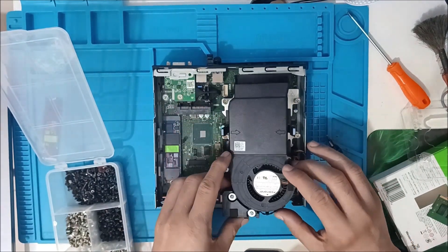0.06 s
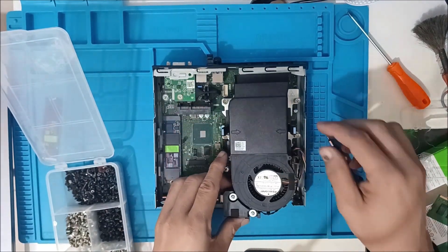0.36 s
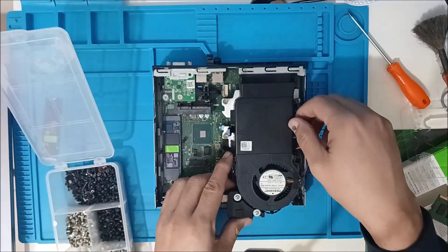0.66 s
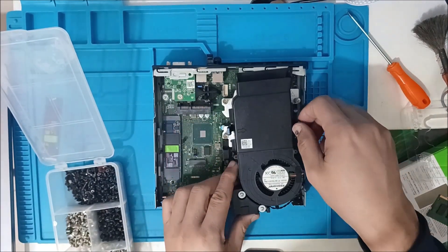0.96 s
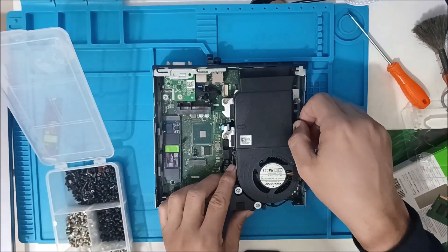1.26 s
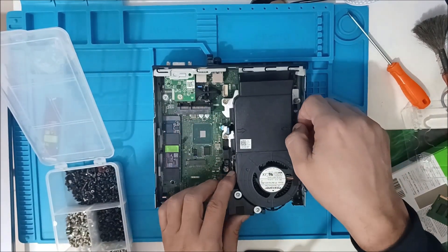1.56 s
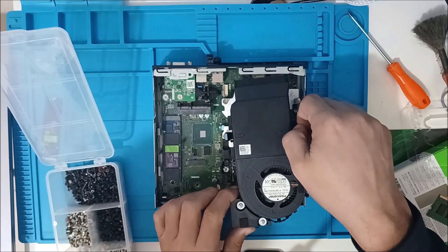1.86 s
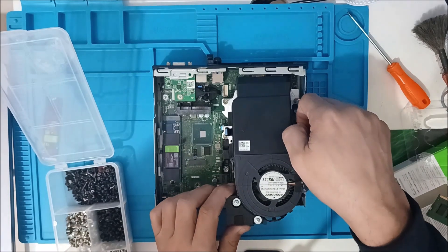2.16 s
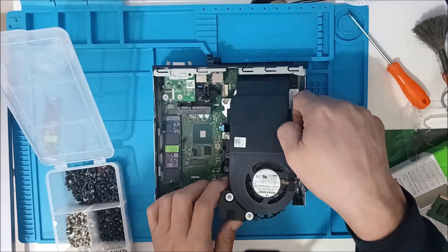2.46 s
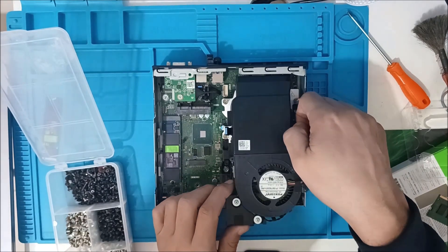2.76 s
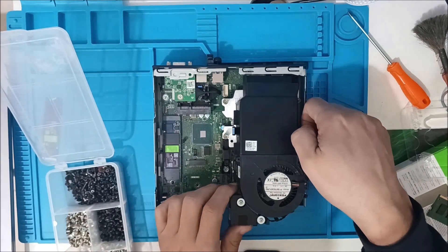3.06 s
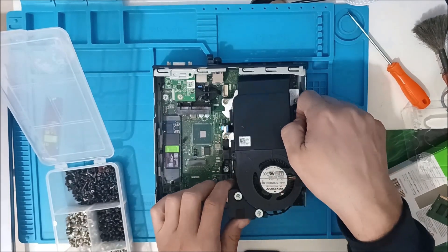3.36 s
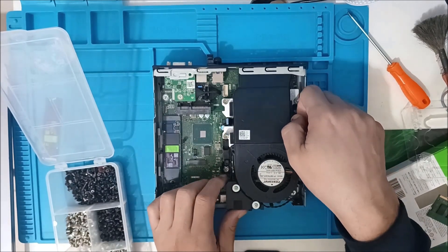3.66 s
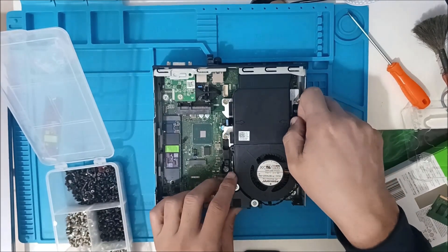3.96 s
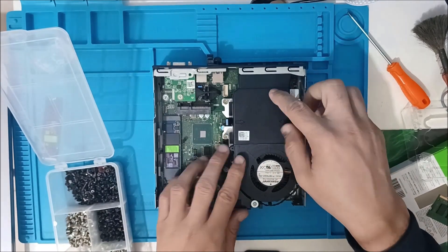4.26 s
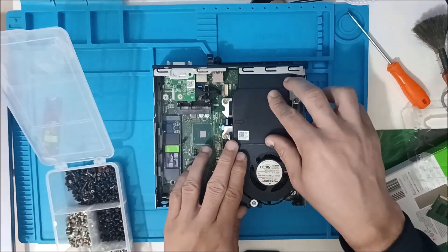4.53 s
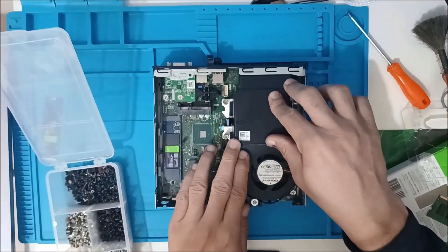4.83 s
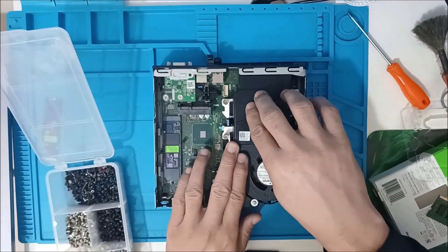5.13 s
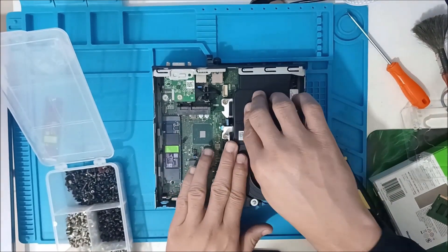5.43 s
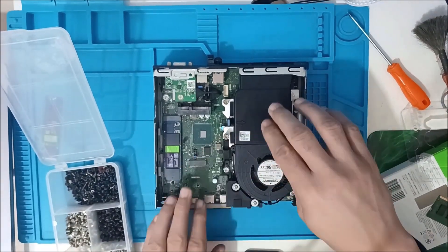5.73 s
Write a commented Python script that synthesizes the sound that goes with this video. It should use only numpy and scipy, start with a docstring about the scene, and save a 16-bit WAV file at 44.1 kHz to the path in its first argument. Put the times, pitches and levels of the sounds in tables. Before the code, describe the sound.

A plastic blower fan is worked into a small steel computer chassis on a rubber mat, heard close in a small room with a steady low rumble. It opens with a short scrape, a squeak and a few ticks. At about 0.6 seconds comes a sharp clack with a dull bump. From 1 to 3 seconds there are quieter, uneven scrapes and light clicks of plastic on metal, with soft hollow knocks from the case. Between 3 and 3.9 seconds the handling gets busier, with grinding, clacks and brief high squeaks. A tiny squeak and a quick cluster of clacks come around 4.5 seconds. At 4.7 seconds the part snaps home, the loudest sound, a rapid double crack with a short low boom from the chassis. From 5 seconds on, only faint ticks and light rubbing remain over the rumble.

```python
"""Fitting a blower into a computer

A plastic blower is worked into the sheet-steel chassis of a small computer, on a rubber bench mat.
It scrapes, ticks and squeaks against the metal, then snaps home. Each touch sets the plastic shell
and steel panels ringing, and harder knocks make the chassis boom. A small room rumbles around it."""
import sys
import numpy as np
from scipy import signal
from scipy.io import wavfile
from scipy.ndimage import uniform_filter1d

SR = 44100
rng = np.random.default_rng(int(sys.argv[2]) if len(sys.argv) > 2 else 0)


def transcribe(signal):
    """Save signal, clipped to [-1, 1], as a 16-bit WAV file at the path in sys.argv[1]."""
    frames = np.atleast_2d(signal).T
    limited = np.clip(frames, -1, 1)
    pcm = np.round(limited * 32767).astype(np.int16)
    wavfile.write(sys.argv[1], SR, pcm)


N = 255339
TIME = np.arange(N) / SR
CUTOFF_HZ = 15100
BAND_EDGES = 20 * 2 ** (np.arange(21) / 2)   # Hz, half an octave apart
BAND_CENTRES = np.sqrt(BAND_EDGES[1:] * BAND_EDGES[:-1])

# The room's background noise: (frequency [Hz], level [dB per Hz])
RUMBLE_SPECTRUM = [(22, -27), (50, -12), (82, -1), (105, -6.5), (170, -6.5), (230, -17.5), (290, -14.5),
                   (700, -43.5), (2000, -38.5), (6000, -44.5), (15000, -45.5)]
# The rise and fall of a low drone: (time [s], level [dB])
DRONE_LEVELS = [(0, -67), (1.2, -47.5), (2.8, -50), (4.3, -47), (5.6, -54.5)]
# How long echoes last; t60 is the time to fade by 60 dB: (frequency [Hz], t60 [s])
ROOM_DECAY = [(600, 0.29), (2500, 0.26), (6000, 0.3), (14000, .22)]
# How alike left and right are, for room and direct sound: (frequency [Hz], likeness [-1 to 1])
ROOM_STEREO = [(100, 0.79), (300, 0.76), (640, 0.36), (1400, -0.085), (4000, 0.48)]
DIRECT_STEREO = [(200, 1), (1000, 0.16), (2500, 0.084), (6000, 0.053), (12000, 0.092)]
# A bump muffled by hands and mat: (frequency [Hz], level [dB per Hz])
BUMP_SPECTRUM = [(45, -24.5), (75, -7), (120, 2.5), (200, -6.5), (300, 0.5), (400, -7.5), (500, -4.5),
                 (800, -29), (3000, -74.5)]
# The chassis's low modes, the notes it rings at: (pitch [Hz], level [dB], t60 [s])
CHASSIS_MODES = [(65, -2, 0.25), (108.4, -5.5, 0.22), (165, 0, 0.16), (199, -8.5, 0.14), (255, -4.5, 0.15),
                 (292.9, 0, 0.18), (330, -4.5, 0.16), (506.2, -4.5, 0.15)]
# Rings of the blower shell and side panels: (pitch [Hz], width [Hz], gain [dB])
SHELL_RINGS = [(506, 84, 8), (1052, 77, -3), (1655, 61, -7), (1990, 130, 3), (10830, 2000, 0.5)]
# The tone of plastic touching steel: (frequency [Hz], level [dB per Hz])
CONTACT_SPECTRUM = [(150, -19), (440, -4), (720, -9), (1100, 4), (1800, 3.5), (2700, 2), (4200, -4.5),
                    (6500, -2.5), (8500, -14), (12200, -11.5), (15500, -27.5)]
# Fingers shifting their grip between pushes: (time [s], level [dB])
GRIP_LEVELS = [(0.0, -45), (0.38, -62.5), (0.72, -59.5), (1.45, -60), (1.8, -49.5), (2.25, -71),
               (2.87, -70.5), (3.35, -48), (3.95, -57.5), (4.6, -61.5), (5.0, -66.5), (5.43, -78),
               (5.79, -66)]
# Pushes that slide the blower: (start [s], length [s], scrape [dB], brightness [dB], shove [dB])
PUSHES = [(0.004, 0.07, -32.5, -9.5, -38), (0.555, 0.056, -35, -6.5, -39), (0.702, 0.21, -53, 1, -51.5),
          (0.996, 0.058, -43.5, -4.5, -52), (1.044, 0.094, -43, 1, -39), (1.234, 0.11, -53, 1, -59),
          (1.631, 0.14, -46.5, -2.5, -55), (1.808, 0.16, -53, -1, -48), (2.082, 0.028, -36, -5.5, -28.5),
          (2.154, 0.057, -57, 2, -41.5), (2.304, 0.026, -42, 1.5, -41), (2.946, 0.073, -53, 7, -60),
          (3.002, 0.037, -42, 3, -34), (3.045, 0.083, -45.5, 6, -45.5), (3.155, 0.17, -40, -5, -36),
          (3.318, 0.071, -40, 7, -38), (3.388, 0.07, -33, -2.5, -29.5), (3.793, 0.073, -44.5, 2, -42.5),
          (4.063, 0.034, -45, 4, -47), (5.06, 0.026, -63.5, 15, -50.5), (5.107, 0.034, -57, 7.5, -54),
          (5.527, 0.018, -47.5, 1.5, -46), (5.589, 0.018, -47.5, 0, -48)]
# A rib catches and grinds: (start [s], end [s], pitch [Hz], width [Hz], level [dB])
RIB_CATCHES = [(0.028, 0.074, 2080, 250, -40.5), (0.036, 0.083, 846, 109, -39.5),
               (0.435, 0.566, 1350, 260, -54.5), (1.035, 1.154, 1110, 380, -48.5),
               (1.762, 1.822, 878, 100, -47.5), (2.303, 2.333, 6400, 1800, -45.5),
               (3.072, 3.138, 2780, 300, -46.5), (3.25, 3.276, 1340, 350, -38),
               (3.345, 3.4, 1667, 120.4, -32), (3.418, 3.469, 2110, 698, -35.5),
               (3.419, 3.531, 1000, 350, -36), (3.856, 3.888, 1250, 219, -41.5),
               (4.135, 4.225, 1960, 450, -69), (5.073, 5.11, 1910, 250, -57.5),
               (5.735, 5.788, 2480, 400, -68)]
# An edge sticks and slips: (start [s], end [s], pitch [Hz], level [dB], octave [dB], wobble [share])
EDGE_SQUEAKS = [(0.047, 0.114, 1289, -30, -24, 0.0098), (1.09, 1.142, 871, -46, -28, 0.025),
                (3.016, 3.073, 1092, -42, -12, 0.018), (3.302, 3.319, 2600, -24, -17, 0.059),
                (3.436, 3.493, 3560, -26.5, -13.5, 0.018), (3.476, 3.488, 3465, -25.5, 5, 0.03),
                (4.444, 4.457, 3995, -23, -34, 0.03)]
# Plastic hits metal: (time [s], clack [dB], brightness [dB], sharpness [dB], thud [dB], ring [Hz])
HITS = [(0.084, -47.5, 2, 13, -43, 2100), (0.114, -39.5, 8, -7, -47, 5000),
        (0.174, -39, -2.5, -10, -46, 2056), (0.247, -32.5, 1.5, -8.5, -33.5, 1495),
        (0.605, -37, 12, -14, -31, 2000), (0.613, -13.5, 5, 0, -29, 1383), (0.617, -19, 0, -7, -29.5, 1100),
        (0.9585, -48.5, 2, -22, -68, 1680), (1.386, -35, -2, -8, -43.5, 2024),
        (1.676, -35, -9, -1, -41.5, 1650), (1.776, -46.5, 4, 4, -44, 905),
        (1.8598, -42, 0, -8, -41.5, 5200), (1.891, -40, 5, 6.5, -65, 2605),
        (1.9466, -39, 0.5, 7.5, -37.5, 1720), (2.0799, -50.5, 0, -3, -32, 1090),
        (2.1045, -42.5, -14, -16, -38, 1050), (2.116, -36.5, -19, -26, -33.5, 1981),
        (2.332, -42, -18, 8.5, -30.5, 7750), (2.4839, -33.5, -4.5, -17, -35.5, 1076),
        (2.5702, -36, -3, -3, -32, 4830), (3.0446, -34, -12, -22, -29.5, 790),
        (3.1853, -23, -7.5, -24, -30.5, 1072), (3.311, -23.5, 4.5, 4, -43, 2042),
        (3.3857, -27, -0.5, -15, -29.5, 4070), (3.482, -36, 12.5, 16, -24.5, 6860),
        (3.4924, -24, -18, -33, -26.5, 2000), (3.7216, -45, -27, -30, -50, 1440),
        (3.8636, -34, -12, -24, -32.5, 1284), (3.932, -45, -4, -25, -44.5, 1330),
        (4.356, -41, -3, -0.5, -35, 2030), (4.446, -20, 4.5, -5, -32.5, 1744),
        (4.465, -23.5, -1.5, -15, -25.5, 1701), (4.4818, -24, 4.5, -15, -24, 3200),
        (4.6937, -9.5, 4.5, 9, -20, 1764), (4.7041, -7.5, 3.5, 0, -11.5, 1592),
        (4.712, -16.5, 7, -12, -23.5, 1690), (4.738, -23, 2.5, -7.5, -30, 1254),
        (5.042, -63.5, -0.5, 23.5, -63.5, 7010), (5.2325, -56.5, -0.5, 16, -44.5, 6110),
        (5.2553, -40.5, -1, -2, -41, 2610)]
HIT_SAMPLES = (np.array(HITS)[:, 0] * SR).astype(int)
THUD_DB = np.array(HITS)[:, 4]


def from_db(db):
    """Turn decibels into a gain."""
    return 10 ** (np.asarray(db) / 20)


def unit_rms(x):
    """Scale a signal to an average (rms) level of 1."""
    return x / np.sqrt(np.mean(x ** 2) + 1e-20)


def at_hz(table, hz):
    """Read between a table's rows on a log-frequency scale."""
    frequencies, values = np.transpose(table)
    return np.interp(np.log(hz), np.log(frequencies), values)


def drift(per_s):
    """A random wander that turns per_s times a second."""
    return unit_rms(np.interp(TIME * per_s, np.arange(SR // 4), rng.standard_normal(SR // 4)))


def noise_bands(spectrum, stereo, size=N):
    """Stereo noise split into bands: (band, channel, sample)."""
    white, bands = rng.standard_normal((2, 2, size + SR // 4)), []
    for k, hz in enumerate(BAND_CENTRES):
        band_pass = signal.butter(2, BAND_EDGES[k:k + 2], "band", fs=SR, output="sos")
        mid, side = signal.sosfilt(band_pass, white[k % 2])[:, -size:]
        alike = at_hz(stereo, hz)
        pair = np.sqrt((1 + alike) / 2) * mid + np.sqrt((1 - alike) / 2) * side * [[1], [-1]]
        bands.append(from_db(at_hz(spectrum, hz)) * pair)
    return np.array(bands, dtype=np.float32)


def resonance(x, hz, width_hz):
    """Let through only the sound near one pitch."""
    r = np.exp(-np.pi * width_hz / SR)
    feedback = [1, -2 * r * np.cos(2 * np.pi * hz / SR), r * r]
    return signal.lfilter(np.array([1, 0, -1]) * (1 - r * r) / 2, feedback, x + 1e-18)


def ring(force, hz, t60):
    """Each click in the force starts a fading sine wave."""
    r, angle = from_db(-60 / (t60 * SR)), 2 * np.pi * hz / SR
    return signal.lfilter([0, np.sin(angle)], [1, -2 * r * np.cos(angle), r * r], force + 1e-18)


def background(rumble_db=-50.5, drone_hz=83, width_hz=11):
    """A low rumble with faint hiss, and a drone that wavers and fades."""
    rumble = unit_rms(noise_bands(RUMBLE_SPECTRUM, ROOM_STEREO).sum(0))
    drone = resonance(rng.standard_normal(N + SR), drone_hz, width_hz)
    drone = unit_rms(resonance(drone, drone_hz, 2 * width_hz)[SR:])
    drone_db = np.interp(TIME, *np.transpose(DRONE_LEVELS))
    return from_db(rumble_db) * rumble + from_db(drone_db) * drone


def room_echo(direct, level_db=-4.5, build_s=0.00022):
    """Reflections from the walls build up quickly, then each band fades at its own rate."""
    t = TIME[:SR // 2]
    bands = noise_bands([(150, -1), (700, 0)], ROOM_STEREO, size=len(t))   # slightly less bass
    decay = from_db(-60 * t / at_hz(ROOM_DECAY, BAND_CENTRES)[:, None])
    tail = (bands * decay[:, None]).sum(0) * (1 - np.exp(-(t / build_s) ** 2))
    tail = unit_rms(tail) / np.sqrt(len(t))
    return from_db(level_db) * signal.fftconvolve(direct, tail, axes=1)[:, :N]


def bumps(shove_db, t60=0.12, swell_s=0.0029, mat_limit_db=-23):
    """The held case bumps at each hit, as far as the mat gives, and mutters when shoved."""
    t, force = TIME[:SR // 4], np.zeros(N)
    shape = (1 - np.exp(-t / swell_s)) * from_db(-60 * t / t60)
    force[HIT_SAMPLES] = from_db(np.minimum(THUD_DB, mat_limit_db))
    loudness = np.hypot(from_db(shove_db - 3.5), signal.fftconvolve(force, shape)[:N])
    return loudness * unit_rms(noise_bands(BUMP_SPECTRUM, DIRECT_STEREO).sum(0))


def mat_bounce(hz=91, t60=0.055, squash_s=0.0041, gain_db=11):
    """The hardest hits drive the case into the rubber mat, which springs back in a few deep cycles."""
    force = np.zeros(N)
    light_hit_db = np.interp(THUD_DB, [-28, -18], [-26, 0])
    force[HIT_SAMPLES] = -from_db(gain_db + THUD_DB + light_hit_db)
    return resonance(ring(force, hz, t60), hz, 1 / (np.pi * squash_s))


def chassis_boom(swell_s=0.0022, muffled_db=-10.5):
    """Hits make the chassis's low modes swell and ring; the hands muffle the lighter ones."""
    out = np.zeros(N)
    blow_db = THUD_DB + np.interp(THUD_DB, [-35, -20], [muffled_db, 0])
    scatter_db = rng.normal(0, 1.5, (len(HITS), len(CHASSIS_MODES)))
    for k, (hz, mode_db, t60) in enumerate(CHASSIS_MODES):
        force = np.zeros(N)
        force[HIT_SAMPLES] = (-1) ** k * from_db(blow_db + mode_db + scatter_db[:, k])
        out += resonance(ring(force, hz, t60), hz, 1 / (np.pi * swell_s))
    return out


def shell_and_panels(struck, rubbed, struck_db=-7.5, rubbed_db=3.0, shift_db=2.5, modes=36):
    """The shell adds its rings, and panel modes come and go as the touching point slides."""
    contact = struck + rubbed
    out = contact + sum(from_db(db) * resonance(contact, hz, width) for hz, width, db in SHELL_RINGS)
    pitches = np.geomspace(600, 9000, modes) * rng.uniform(.975, 1.025, modes)
    for k, hz in enumerate(pitches):
        rub_gain = from_db(rubbed_db + shift_db * np.minimum(drift(per_s=14), 2))
        force = from_db(struck_db) * struck[k % 2] + rub_gain * rubbed[k % 2]
        out += resonance(force, hz, width_hz=36 * np.sqrt(hz / 2000))
    return out / np.sqrt(2)


def push_levels(rise_s=0.033, stop_s=0.0098):
    """Each push rises, holds and dies away over the grip's light rub: scrape, brightness, shove in dB."""
    grip_db = np.interp(TIME, *np.transpose(GRIP_LEVELS))
    power = from_db([grip_db, grip_db - 3.5, grip_db + 1]) ** 2   # scrape, treble, shove
    for start, length, scrape_db, bright_db, shove_db in PUSHES:
        age = TIME - start
        speed = np.clip(age / rise_s, 0, 1) * np.exp(-np.clip(age - length, 0, 1) / stop_s)
        power += (from_db([[scrape_db], [scrape_db + bright_db], [shove_db]]) * speed) ** 2
    scrape_db, treble_db, shove_db = 10 * np.log10(power)
    return scrape_db, treble_db - scrape_db, shove_db


def scrape(plate_noise, scrape_db, bright_db, gain_db=-5.5, slips_per_s=270, slip_s=0.0018, steady=0.22):
    """Tiny slips ring the steel plates, over a rub that surges as the plastic grabs and lets go."""
    surge = unit_rms(from_db(2.6 * drift(per_s=70)))
    sizes = from_db(3.2 * np.minimum(rng.exponential(1, N), 3))
    slips = (rng.random(N) < slips_per_s / SR) * sizes ** 2
    energy = signal.lfilter([1], [1, -np.exp(-1 / (slip_s * SR))], slips + 1e-18)   # each slip fades
    grain = np.sqrt((energy / energy.mean() + steady) / (1 + steady))
    treble = BAND_CENTRES > 2500
    rub = plate_noise[~treble].sum(0) + from_db(bright_db) * plate_noise[treble].sum(0)
    return from_db(gain_db + scrape_db) * surge * grain * rub


def rib_catches(slips_per_s=420, spread_db=1.5, steady=0.8):
    """A rib grinds along in tiny, uneven slips that shake one panel resonance."""
    out = np.zeros((2, N))
    slipping = rng.random(N) < slips_per_s / SR
    slips = slipping * from_db(spread_db * np.minimum(rng.exponential(1, N), 3))
    grain = unit_rms(uniform_filter1d(slips, size=40)) + steady
    force = grain * (rng.standard_normal(N) + rng.standard_normal((2, N)) / 2)
    for start, end, hz, width, level_db in RIB_CATCHES:
        span = slice(int(start * SR), int(end * SR))
        grind = unit_rms(resonance(resonance(force[:, span], hz, width), hz, 2 * width))
        out[:, span] += from_db(level_db) * signal.windows.tukey(grind.shape[1], .5) * grind
    return out


def squeaks(flutter_db=3.0, third_db=-8.5):
    """An edge sticks and slips in step with one plate mode: a wavering tone with two overtones."""
    out, wobble = np.zeros(N), drift(per_s=650)
    flutter = from_db(flutter_db * drift(per_s=160))
    for start, end, hz, level_db, octave_db, wobble_share in EDGE_SQUEAKS:
        span = slice(int(start * SR), int(end * SR))
        phase = 2 * np.pi * np.cumsum(hz * (1 + wobble_share * wobble[span])) / SR
        gains = from_db([0, octave_db, octave_db + third_db])
        tone = sum(gain * np.sin(k * phase) for k, gain in enumerate(gains, 1))
        out[span] += from_db(level_db) * signal.windows.tukey(len(phase), .5) * flutter[span] * tone
    return out


def bracket(squeal):
    """The steel bracket picks up a squeak near its own pitch and sings on after it."""
    return squeal + resonance(squeal, hz=3545, width_hz=40)


def hit_treble_db(hz, bright_db, sharp_db):
    """How strong a hit's treble is next to its middle range."""
    return at_hz([(1800, 0), (3800, bright_db), (10000, sharp_db)], hz)


def spot_rings(damping=0.41):
    """Each struck spot has its own hollow ring: one mode and a weaker one just above it."""
    out, click = np.zeros(N), signal.unit_impulse(SR // 5)
    for at, (_, clack_db, bright_db, sharp_db, _, hz) in zip(HIT_SAMPLES, HITS):
        t60 = 0.031 * (hz / 2000) ** -damping
        pair = ring(click, hz, t60) - 0.5 * ring(click, 1.16 * hz, t60 / 2)
        level_db = clack_db + hit_treble_db(hz, bright_db, sharp_db) + at_hz(CONTACT_SPECTRUM, hz) / 2
        out[at:at + len(click)] += from_db(level_db) * pair
    return out


def clacks(plate_noise, damping=0.22, gain_db=1.0):
    """Hits ring many plate modes at once. Hard hits are quicker and shorter; high modes die first."""
    out, t = np.zeros((2, N)), TIME[:SR // 10]
    soft_to_hard_db = [-35, -15]
    for at, (_, clack_db, bright_db, sharp_db, _, _) in zip(HIT_SAMPLES, HITS):
        span = slice(at, at + len(t))
        rise_s = np.interp(clack_db, soft_to_hard_db, [0.0013, 0.0003])
        t60 = np.interp(clack_db, soft_to_hard_db, [0.055, 0.032]) * (BAND_CENTRES / 2000) ** -damping
        shape = (1 - np.exp(-t / rise_s)) * from_db(-60 * t / t60[:, None])
        gain = from_db(gain_db + clack_db + hit_treble_db(BAND_CENTRES, bright_db, sharp_db))
        loudness = gain[:, None] * shape
        out[:, span] += (plate_noise[:, :, span] * loudness[:, None]).sum(0)
    return out


def scene():
    """Plastic meets steel, rings the shell, rocks the chassis and fills the room."""
    scrape_db, bright_db, shove_db = push_levels()
    plate_noise = noise_bands(CONTACT_SPECTRUM, DIRECT_STEREO)   # crowded modes sound like noise
    middle = (BAND_CENTRES > 640) & (BAND_CENTRES < 2560)
    plate_noise /= plate_noise[middle].sum(0).std()
    contact = shell_and_panels(clacks(plate_noise), scrape(plate_noise, scrape_db, bright_db))
    contact = contact + spot_rings() + rib_catches() + bracket(squeaks())
    contact *= from_db([[0.7], [-0.5]])   # a little to the left
    left, right = contact + chassis_boom() + mat_bounce() + bumps(shove_db)
    direct = np.array([left, np.pad(right, (2, 0))[:N]])   # the right side arrives two samples later
    return direct + room_echo(direct) + background()


def record(dry):
    """Squash the peaks of the hardest snap and cut the highest treble."""
    low_pass = signal.cheby1(12, .2, CUTOFF_HZ, fs=SR, output="sos")
    return signal.sosfilt(low_pass, np.tanh(dry))


dry = scene()
out = record(dry)
transcribe(out)
```